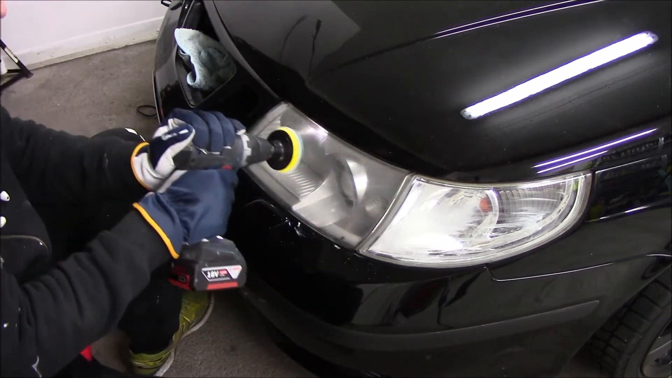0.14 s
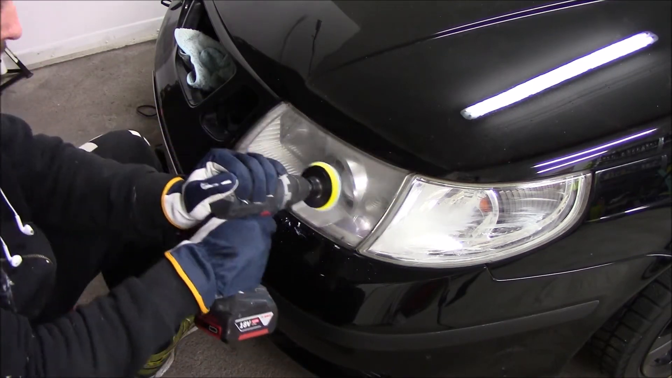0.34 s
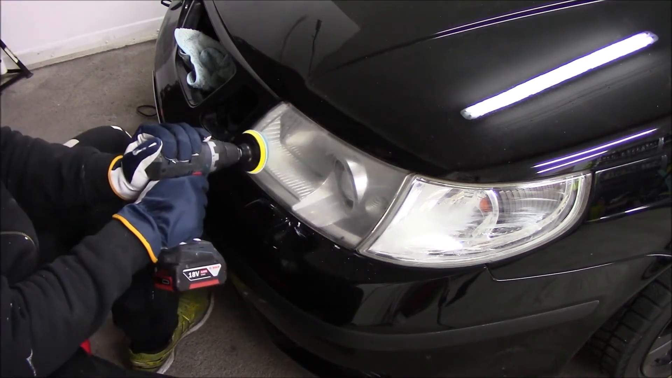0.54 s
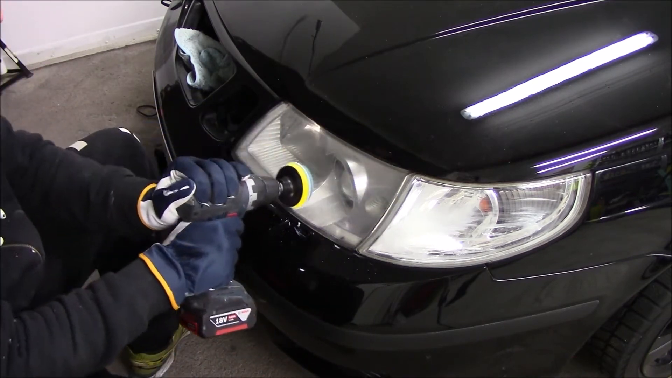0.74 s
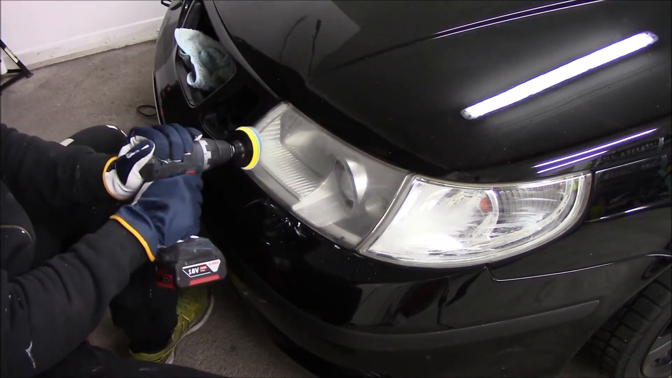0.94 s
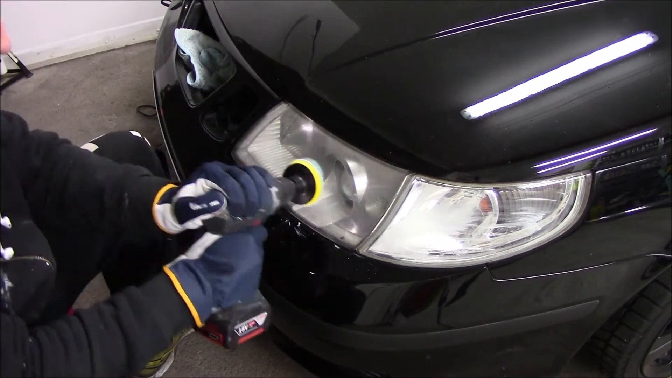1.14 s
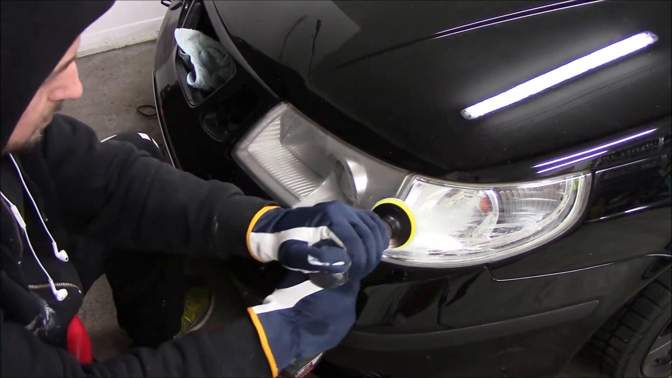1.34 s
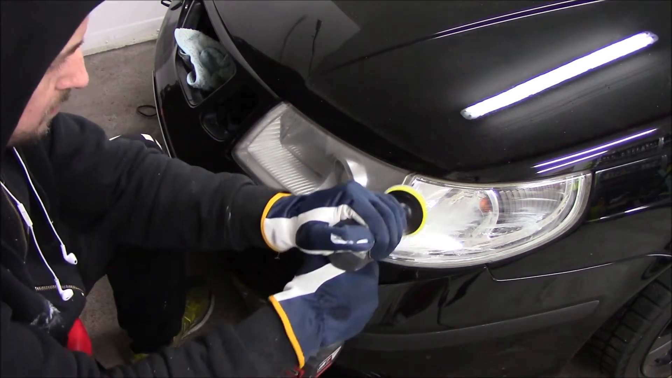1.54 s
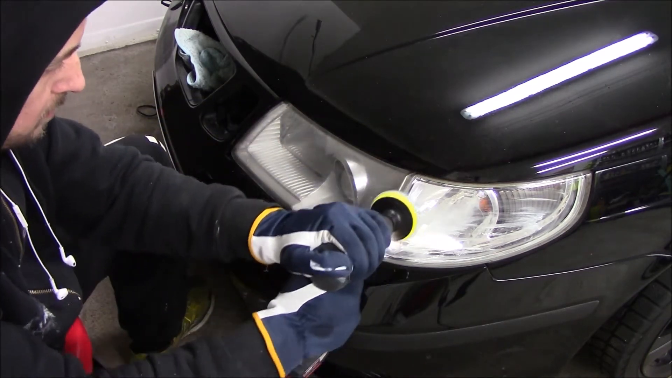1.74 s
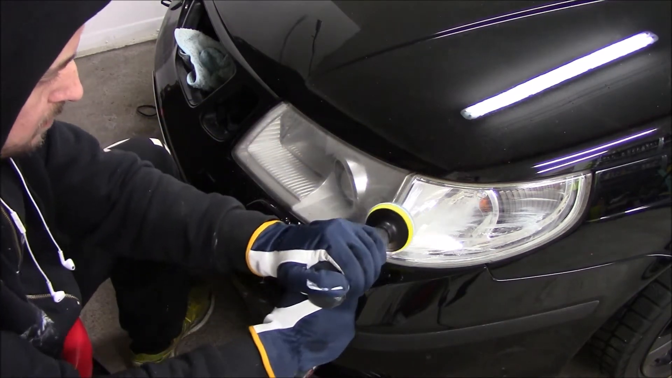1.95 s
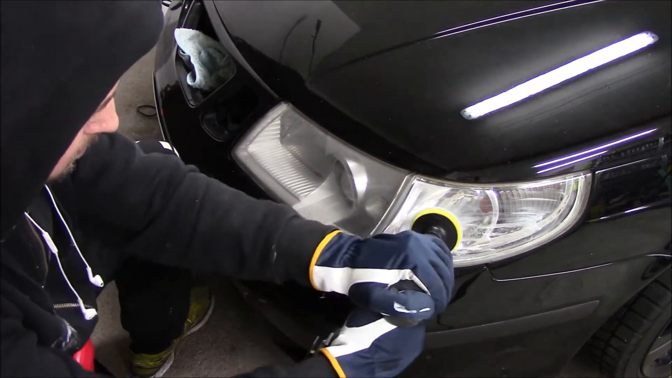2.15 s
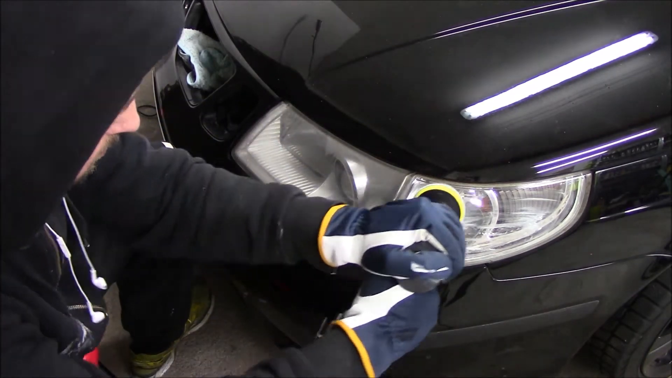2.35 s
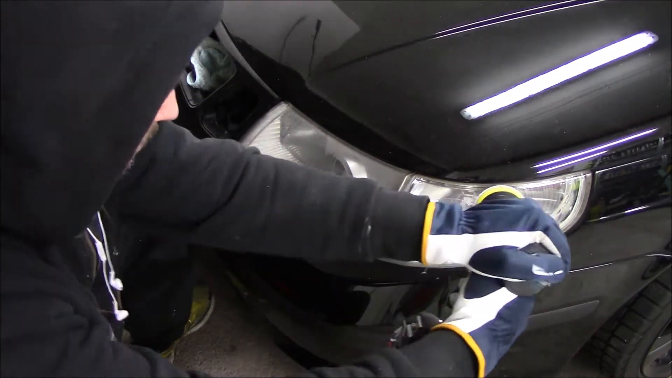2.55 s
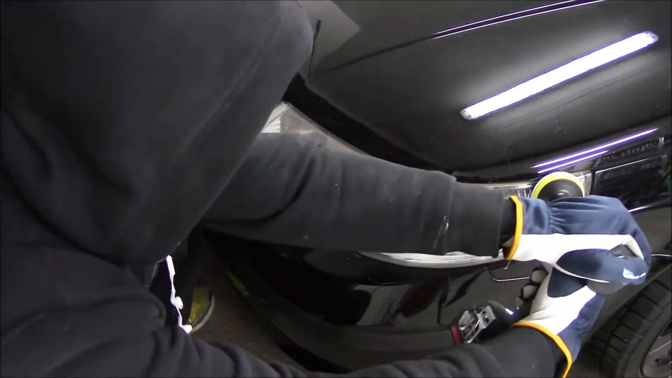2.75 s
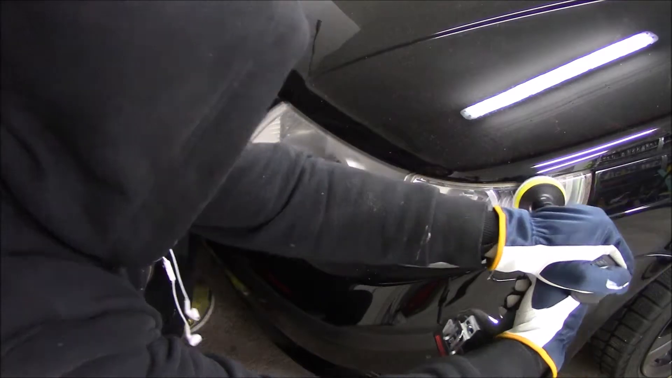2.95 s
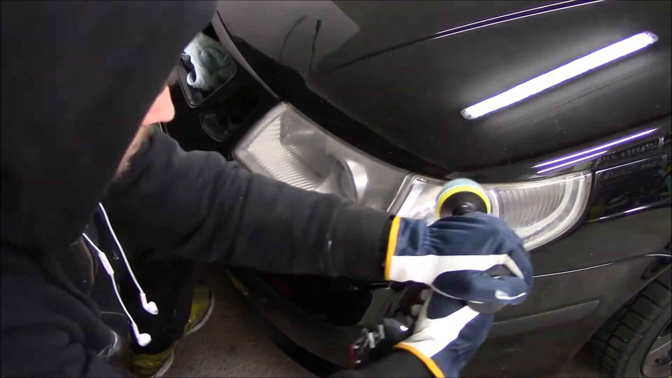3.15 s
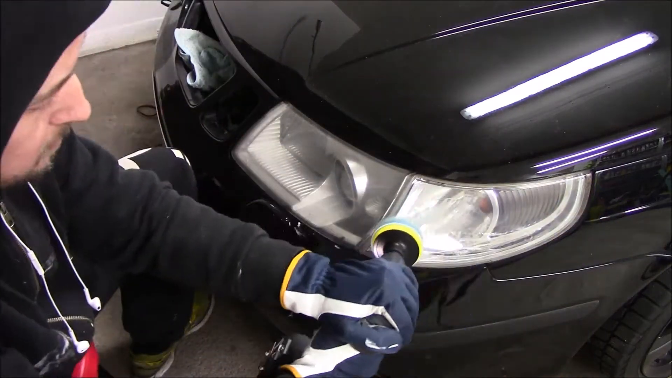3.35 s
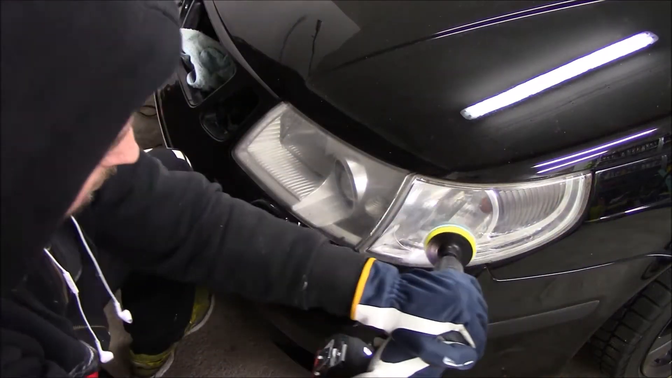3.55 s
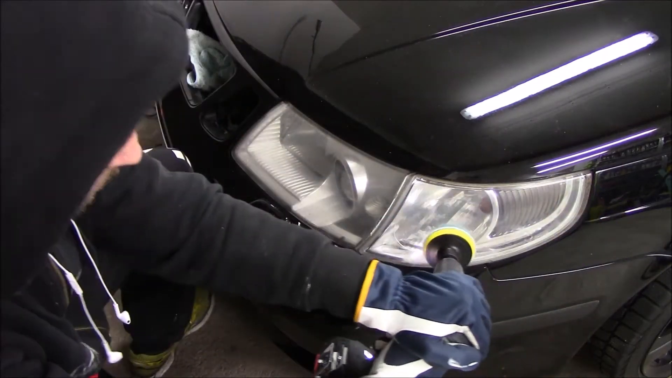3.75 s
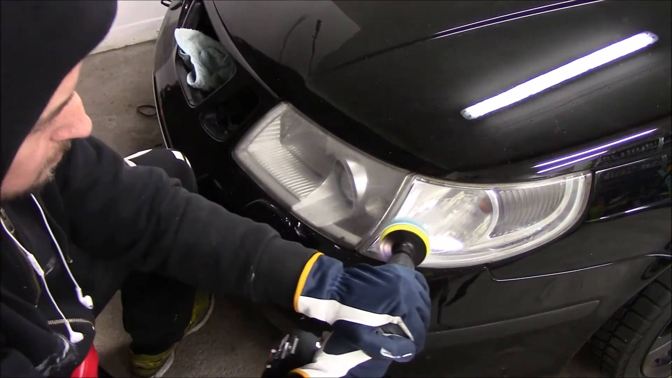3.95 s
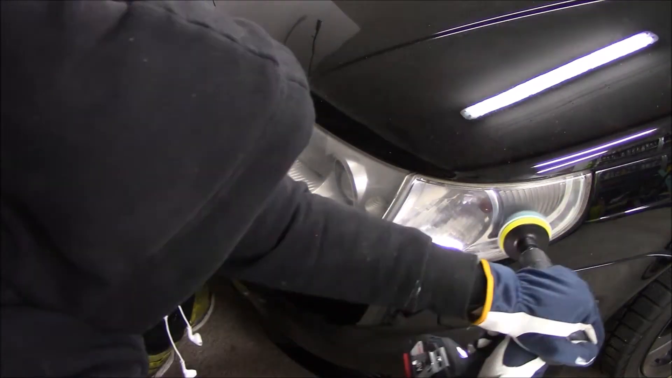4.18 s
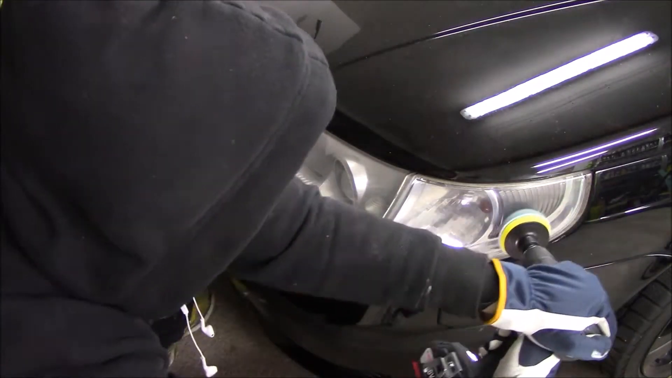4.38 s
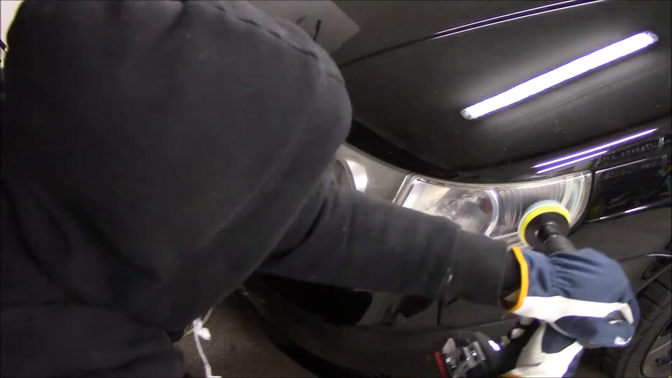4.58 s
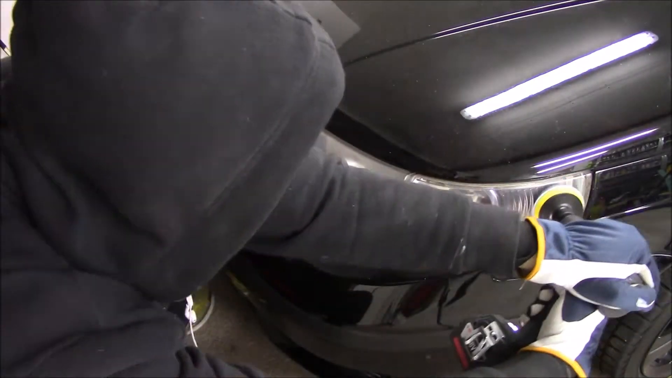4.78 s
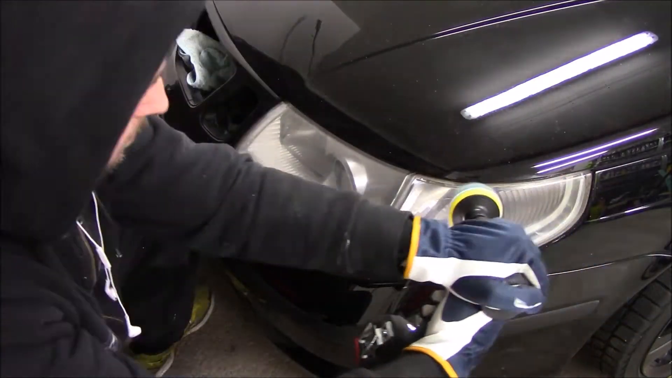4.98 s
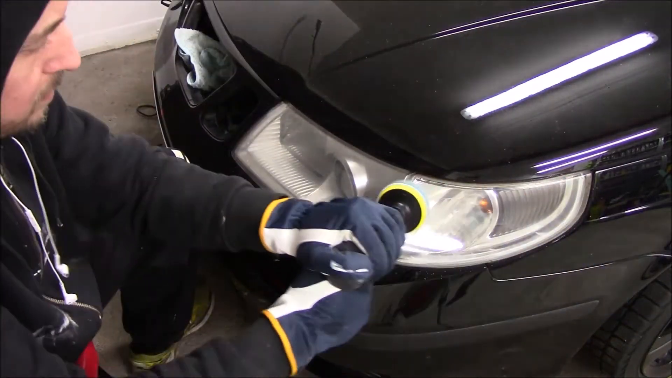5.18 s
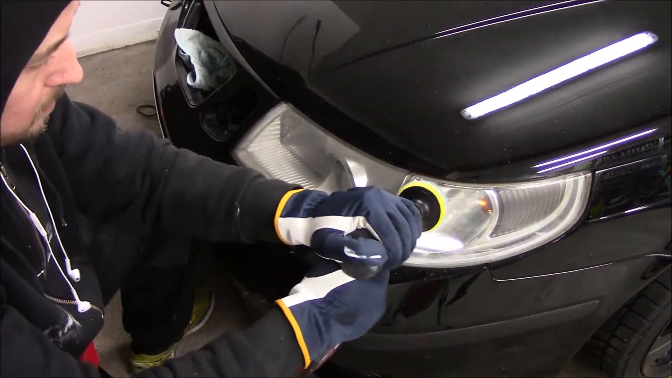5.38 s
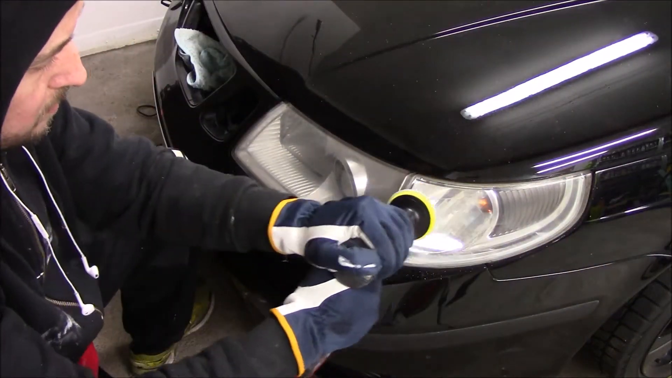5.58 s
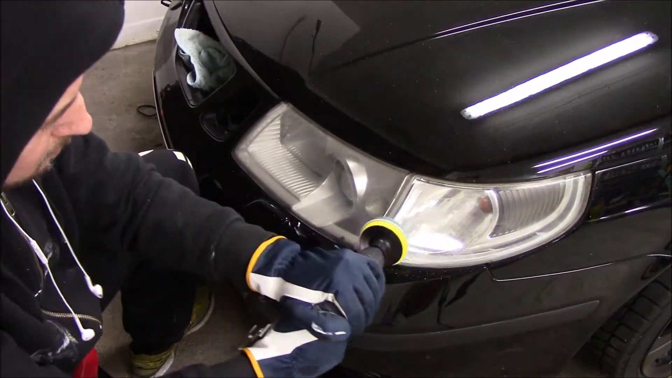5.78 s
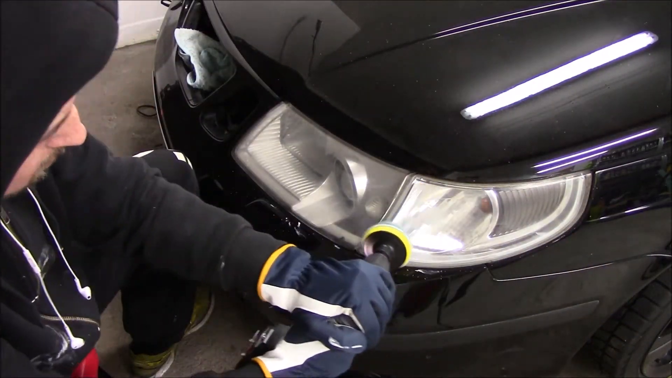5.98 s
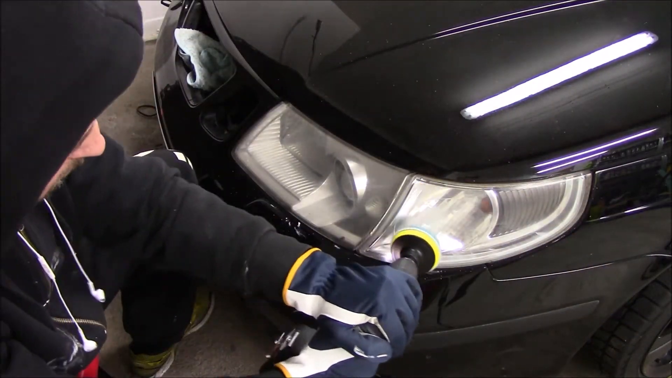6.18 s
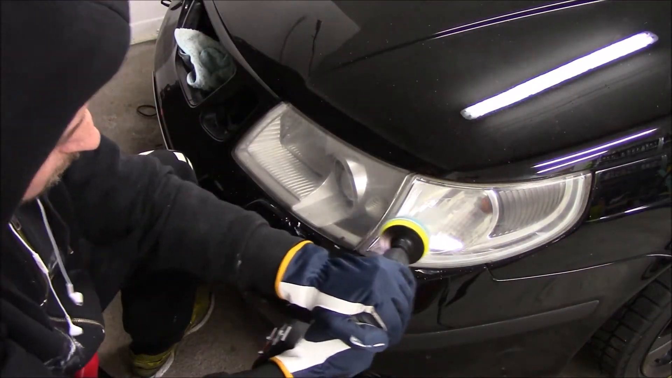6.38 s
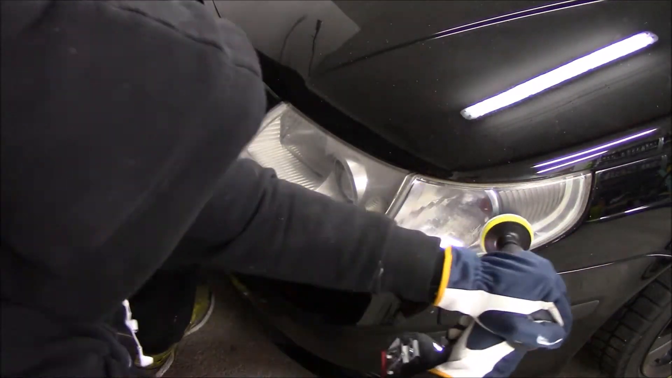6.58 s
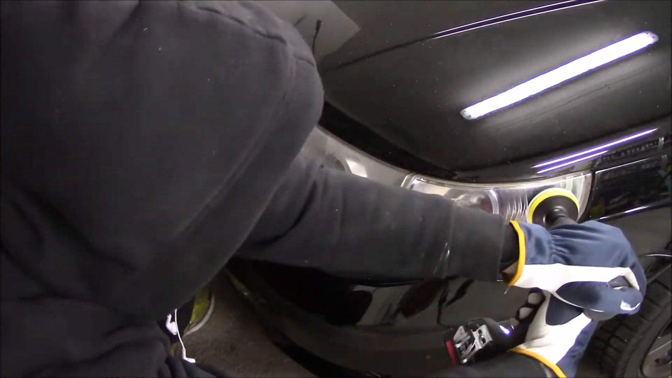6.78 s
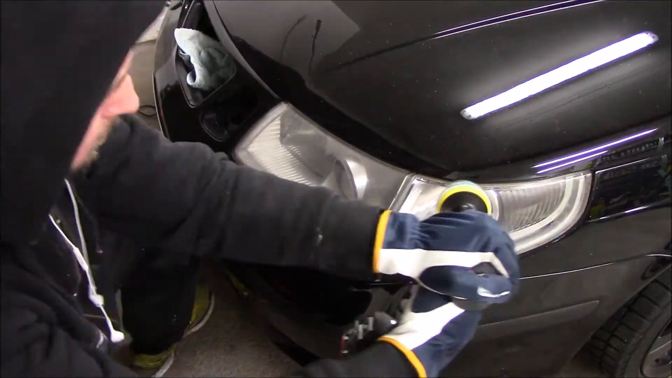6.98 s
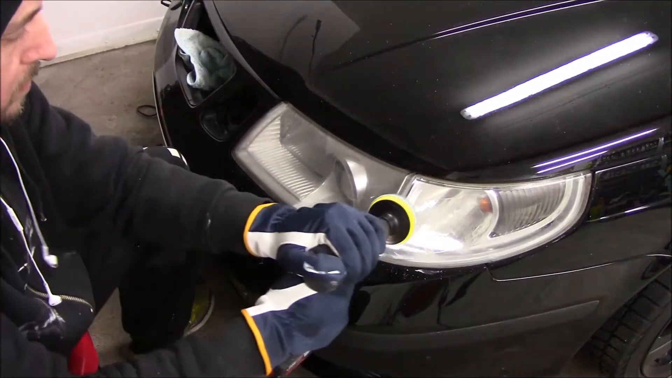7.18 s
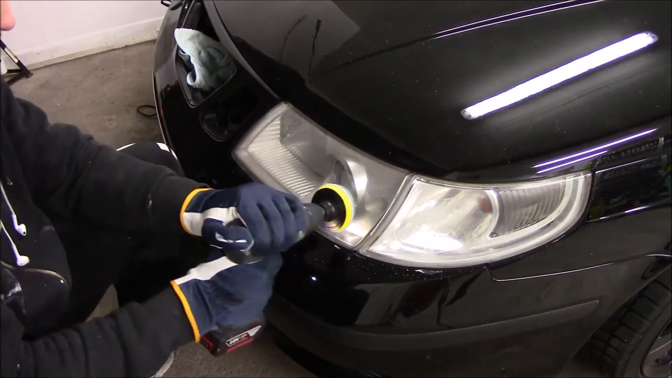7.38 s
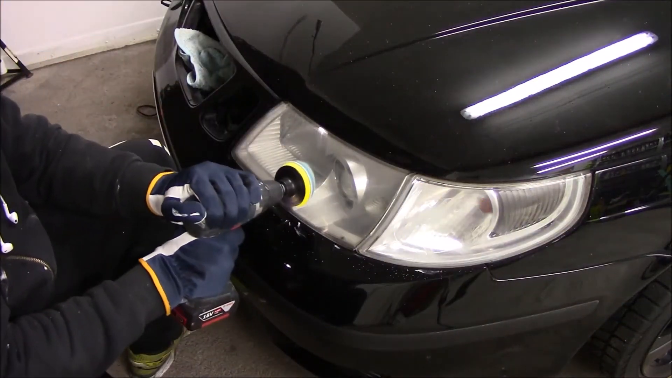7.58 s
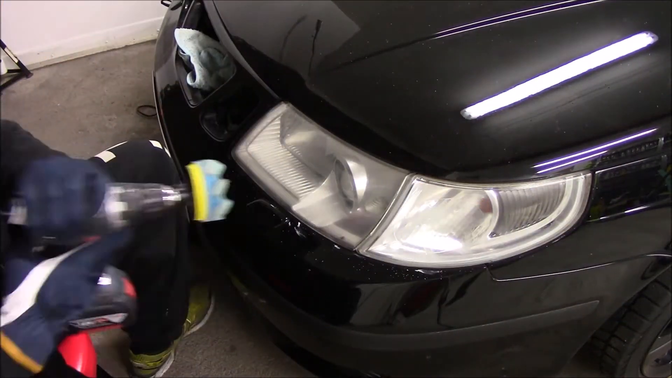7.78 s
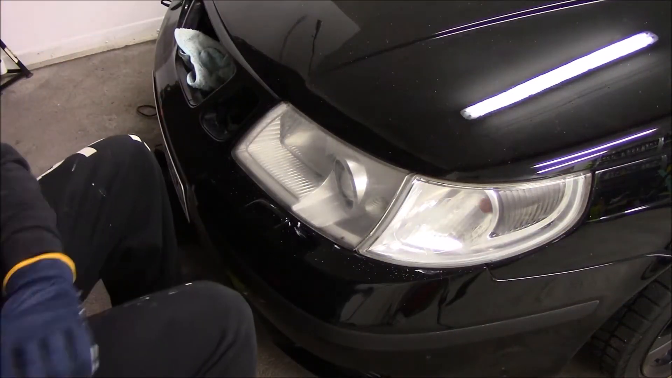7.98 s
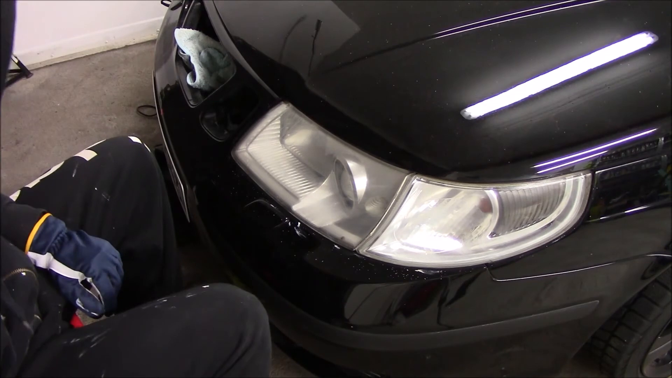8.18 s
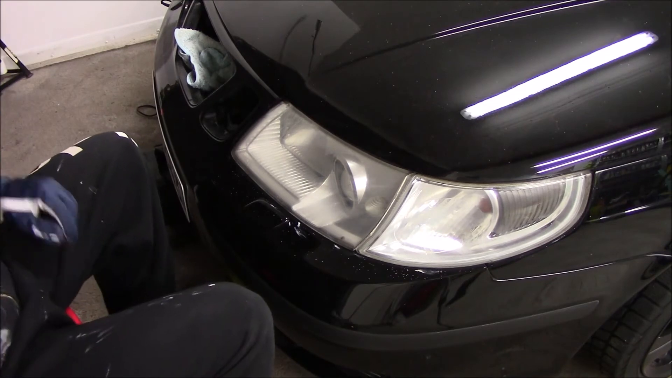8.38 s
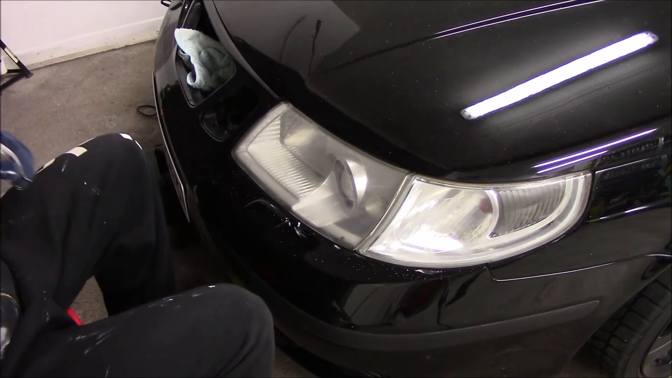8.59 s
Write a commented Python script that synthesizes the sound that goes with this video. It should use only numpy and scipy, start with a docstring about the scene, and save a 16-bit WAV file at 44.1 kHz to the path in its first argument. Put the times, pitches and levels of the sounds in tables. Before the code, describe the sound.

Continuous power drill noise, gritty and hissing, with thin metallic whines that tremble slightly under load and faint hollow lens resonances. The whine plunges in an instant when the motor is braked, leaving near silence in a small, fairly dry garage. Then come slight clothing rustles, one clear plastic knock with tiny ticks after it, and dull quiet background. Heard in mono from a nearby camera.

```python
"""A cordless drill spins a foam pad over a headlight lens in a garage, heard by a mono camera microphone.
Its whine and gear mesh are sines locked to one motor phase; rattle, fan, housing and pad are shaped noise.
The brake stops it: the whine falls ever faster and the noise dies away in the garage.
Cloth rustles and a few small knocks of plastic parts follow, as noise bursts and resonances.
A faint lumpy rumble lies beneath, until the background turns to a duller room hush."""
import sys
import numpy as np
from scipy import signal
from scipy.fft import rfft, irfft, next_fast_len
from scipy.io import wavfile
from scipy.ndimage import uniform_filter1d, map_coordinates

SR = 44100
rng = np.random.default_rng(int(sys.argv[2]) if len(sys.argv) > 2 else 0)


def output_pcm(signal):
    """Save a mono or channel-first signal as 16-bit PCM at the path in sys.argv[1].

    Samples are clipped to [-1, 1] before scaling.
    """
    pcm = np.clip(np.atleast_2d(signal).T, -1, 1) * 32767
    wavfile.write(sys.argv[1], SR, np.round(pcm).astype(np.int16))


N = 380577  # length in samples

# planet beat, shaft beat and tooth mesh as multiples of the whine frequency
PLANET_RATIO, SHAFT_RATIO, MESH_RATIO = .0656, .2075, 2.622
# the trigger is let go and the whine falls with the square of time; then the tones end
BRAKE_S, BRAKE_HZ_PER_S2, WHINE_END_S, TONES_END_S = 7.66, 62000, 7.722, 7.735
NOISE_STOP_S, ROOM_T60_S = 7.731, 0.11  # the brake bites; the garage dies away
REACH_TURN_S = 0.17  # half the time taken to turn in or out of a reach
MESH_1_REST_DB, CASE_REST_DB = -54, -54  # both rise with each reach
SLAP_OVER_RUB = 1.6  # slap gain against plain rubbing, at the height of a boom
BOOM_WIDTH_S, LENS_REST_DB = 0.076, -70.5
RUSTLE_WIDTH_S, CLOTH_REST_DB = 0.014, -61
HUSH_DB, HUSH_START_S = -62, 8.422
TOP_HZ = 15770  # band limit of the camera

# the motor under the load of the pad: time_s, whine_hz
MOTOR_SPEED = [(0.0, 1337), (0.04, 1326), (0.17, 1326), (0.3, 1303), (0.62, 1333), (0.77, 1309),
               (1.02, 1328), (1.56, 1319), (1.62, 1337), (1.73, 1316), (1.79, 1341), (1.9, 1324),
               (2.0, 1338), (2.13, 1323), (2.22, 1336), (2.6, 1316), (2.77, 1327), (2.84, 1315),
               (3.28, 1351), (3.43, 1345), (3.52, 1322), (4.14, 1332), (4.33, 1316), (4.44, 1326),
               (4.8, 1319), (5.21, 1344), (5.52, 1322), (5.8, 1327), (5.87, 1317), (6.29, 1328),
               (6.34, 1338), (6.59, 1303), (6.78, 1302), (7.04, 1327), (7.19, 1328), (7.47, 1310),
               (7.66, 1317)]
# level of the whine: time_s, level_db
WHINE_LEVEL = [(0.0, -52.5), (0.1, -51), (0.39, -57), (0.62, -46), (0.75, -53.5), (1.14, -45.5),
               (1.35, -57), (2.77, -47.5), (4.55, -47), (4.61, -51.5), (4.97, -46.5), (5.57, -54),
               (5.92, -47.5), (6.33, -48), (6.84, -43), (7.42, -55.5), (7.68, -48), (7.7, -51)]
# other tone groups: time_s, fourth_multiple_db, eighth_multiple_db, second_mesh_db, third_mesh_db
TONE_LEVELS = [(0, -56, -48, -58, -53), (.3, -43, -45, -43, -53), (.6, -53, -45, -48, -52),
               (.95, -43, -44, -45, -54), (1.2, -44, -46, -44.5, -43), (2, -39, -41.5, -44.5, -43),
               (2.45, -49, -44, -41, -51), (2.8, -38, -40.5, -47.5, -58), (3.05, -39, -41, -46, -35),
               (3.3, -44, -41, -39, -52), (3.7, -44, -39, -41.5, -35), (4.2, -41, -42.5, -45, -43),
               (4.6, -38.5, -40.5, -45, -36), (5, -40.5, -39.5, -43, -57), (5.3, -38, -42, -40.5, -48),
               (5.6, -46, -41, -44.5, -53.5), (5.9, -51, -41.5, -44, -42), (6.2, -44, -46, -43, -38),
               (6.45, -48, -38, -42.5, -44), (6.7, -40, -42.5, -43, -43), (7, -44, -39.5, -42, -49),
               (7.3, -44, -41.5, -49, -44), (7.66, -39, -44, -48, -50), (7.7, -38.5, -52, -55, -54),
               (7.74, -44, -60, -58, -58)]
# lines on the whine: multiple (of the whine), planet_turns, shaft_turns; then relative level_db of each
FIRST_LINES = [(1, 0, 0), (1, 1, 0), (1, -1, 0), (2, 0, 0)]
FIRST_LINES_DB = [1, -24.5, -25.5, -11]
FOURTH_LINES = [(4, 0, 0)]
EIGHTH_LINES = [(8, 0, 0), (8, 0, -1), (8, 1, 0), (8, -1, 0), (8, 2, 0), (8, 1, 1), (10, 0, 0)]
EIGHTH_LINES_DB = [5.5, -6, -2.5, -11, -3, -12, -13]
# lines on the gear mesh: multiple (of the mesh), planet_turns, shaft_turns; then relative level_db of each
MESH_1_LINES = [(1, 0, 0), (1, 1, 0), (1, 2, 0), (1, 2, -1)]
MESH_1_LINES_DB = [-3, -3, -8, -9]
MESH_2_LINES = [(2, 0, 0), (2, 1, 0), (2, 1, -1), (2, 2, -1), (2, 2, 0), (2, 3, 0), (2, 1, 1), (2, 2, 1),
                (2, 3, 1)]
MESH_2_LINES_DB = [-3.5, -15, -33, -1, -19, -2, -7, -7.5, -14]
MESH_3_LINES = [(3, 5, 0), (3, 0, 0), (4, 5, 0)]
MESH_3_LINES_DB = [0, -6, -11]
# the arms stretch to the far end of the lens and the gear case turns to the microphone:
# start_s, end_s, rise_db
ARM_REACHES = [(2.6, 3.15, 9), (4.147, 4.96, 9), (6.65, 6.966, 10)]
# resonances of the gear case: centre_hz, width_hz, relative level_db
GEAR_CASE_MODES = [(2110, 150, 2.5), (3417, 120, 1)]
# noisy layers of the drill: time_s, rattle_db, fan_db, housing_db, rub_db
NOISE_LEVELS = [(0, -32, -42, -46, -75), (.1, -32, -42, -46, -76), (.7, -31, -41.5, -44.5, -75),
                (1.15, -31, -38.5, -44.5, -71), (1.5, -30.5, -40.5, -45.5, -73),
                (2.25, -28.5, -36.5, -43.5, -67.5), (2.6, -30, -35, -42.5, -72),
                (3.1, -29, -36.5, -40.5, -65), (3.5, -29, -35, -44, -70), (4.1, -29.5, -35, -43.5, -68.5),
                (4.8, -30, -34.5, -41, -67), (5.3, -28, -37.5, -43.5, -70), (5.6, -29.5, -37, -44, -70),
                (6.1, -30, -35.5, -43.5, -67), (6.4, -27.5, -35.5, -43.5, -69), (6.8, -31, -34, -43, -67),
                (7.05, -29, -36, -43.5, -66.5), (7.3, -28.5, -35, -43, -69), (7.55, -29.5, -41, -45, -71),
                (7.72, -29.5, -36, -44, -67)]
# spectrum of the gear rattle: frequency_hz, relative density_db (per Hz)
RATTLE_SPECTRUM = [(3000, -50), (3500, -9.5), (4500, -6), (5500, -5), (7000, -2.5), (8500, -3.5),
                   (10600, -2), (11500, -2.5), (12500, -16)]
# spectrum of the cooling fan: frequency_hz, relative density_db (per Hz)
FAN_SPECTRUM = [(10500, -39.5), (11800, 4), (13000, 7), (15000, 6), (15800, -1.5)]
# a resonance that moves with the drill's place on the lens: time_s, centre_hz, level_db
CAVITY_PATH = [(0, 4700, -39), (.15, 4960, -37), (.3, 3910, -36.5), (.5, 4950, -38.5), (.75, 4660, -37),
               (1, 5080, -37.5), (1.3, 4150, -38.5), (2.2, 4350, -37.5), (2.6, 4100, -41.5),
               (3.2, 4320, -38.5), (3.45, 4700, -38.5), (4.2, 4530, -40), (4.5, 4530, -38.5),
               (4.8, 4330, -38), (5.55, 4030, -38.5), (5.75, 4600, -37.5), (6.1, 5020, -38),
               (6.5, 4660, -38.5), (6.75, 4250, -39.5), (7.2, 4180, -37), (7.5, 4660, -36)]
# resonances of the housing: centre_hz, width_hz, relative level_db
HOUSING_MODES = [(1380, 420, -4), (1857, 110, -1.5), (2165, 114, 1), (2364, 67, -1), (2467, 42, 1.5),
                 (2640, 37, 0.5), (2784, 82, 3.5), (3240, 570, -4)]
# resonances of the lens: centre_hz, width_hz, relative level_db
LENS_MODES = [(960, 55, -1), (1050, 55, -1), (1145, 60, -3)]
# the lens booms where the pad presses on its thin parts: time_s, swell level_db (added to the rest gain)
LENS_BOOMS = [(.15, -64), (.36, -65), (.49, -63), (.66, -60.5), (.86, -62), (1.12, -65), (2.05, -75),
              (2.77, -70), (3.05, -64), (4.77, -69), (4.97, -69), (7.25, -71), (7.55, -61), (7.64, -72)]
# resonances of the foam pad: centre_hz, width_hz, relative level_db
FOAM_MODES = [(588, 70, 3), (834, 360, 2.5)]
# knocks: time_s, level_db (before a common 10.5 dB cut), decay t60_s, ring_db (relative to the knock),
# pitch_factor (smaller parts ring higher)
KNOCK_EVENTS = [(7.7204, -18.5, .015, -27, 1.01), (7.8696, -36, .02, -30, 1.01), (7.938, -51, .1, 7, 0.93),
                (7.969, -47.5, .04, -9.5, 1.01), (8.1538, -20.5, 0.092, -6.5, 1.01),
                (8.2207, -42, .04, -1, 1.34), (8.232, -53, .03, -2, 1.34),
                (8.2571, -50.5, 0.032, 11.5, 1.34), (8.275, -53, .03, 3, 2)]
# resonances of plastic parts at pitch factor 1: centre_hz, width_hz, relative level_db
PLASTIC_MODES = [(1250, 200, -10), (1570, 120, 0), (2120, 200, -11), (3640, 250, -8), (5600, 500, -10)]
# swells of the cloth: time_s, swell level_db (added to the rest gain)
RUSTLE_EVENTS = [(7.9, -72), (7.95, -59), (8.2, -63), (8.42, -71)]
# spectrum of the cloth: frequency_hz, relative density_db (per Hz)
WEAVE_SPECTRUM = [(20, -38), (150, -26), (400, -22), (600, -10.5), (950, -7), (1500, -3), (3000, -4.5),
                  (5500, -7), (10000, -4.5), (13000, -9), (15800, -7.5)]
# level of the rumble: time_s, level_db
RUMBLE_LEVEL = [(0, -89), (1, -82), (1.7, -93), (2.3, -81), (2.7, -90), (3.9, -76), (4.8, -89), (5.3, -77),
                (5.7, -83), (6.4, -74), (7, -83), (7.65, -77), (7.81, -96), (8.4, -100)]
# spectrum of the rumble: frequency_hz, relative density_db (per Hz)
RUMBLE_SPECTRUM = [(15, -17), (30, -8), (80, -9.5), (200, -11), (350, -7.5), (500, -5.5), (600, -8),
                   (800, -40)]
# spectrum of the room hush: frequency_hz, relative density_db (per Hz)
HUSH_SPECTRUM = [(24, -54), (40, -37), (193, -16), (236, -15.5), (566, -12), (866, -15), (982, -16),
                 (1140, -15), (1260, -16.5), (6560, -28), (15800, -45)]


def drill():
    """Superposition: one motor phase drives the tones and modulates the noise of gears, fan and housing."""
    rattle_db, fan_db, housing_db, rub_db = curves(NOISE_LEVELS)
    turns = motor_turns()
    gears = knocking(turns, throb=0.049, grain_db=0.5)
    rattle = amp(rattle_db + 0.21 * wobble(7)) * patches(shaped(gears, RATTLE_SPECTRUM), patchy_db=1.6)
    fan = amp(fan_db + 0.64 * wobble(7)) * patches(shaped(gears, FAN_SPECTRUM), patchy_db=1.2)
    hollow = amp(curves(CAVITY_PATH)[1]) * cavity(turns)
    housing_drive = knocking(turns, throb=.1, grain_db=-1.0)
    housing = amp(housing_db) * ringing(housing_drive, HOUSING_MODES, skirt_hz=1300)
    rub_noise = rng.standard_normal(N)
    rub = amp(rub_db + 3 * wobble(9)) * ringing(rub_noise, FOAM_MODES, skirt_hz=556)
    after_stop_s = np.clip(np.arange(N) / SR - NOISE_STOP_S, 0, None)
    dying = amp(-60 * after_stop_s / ROOM_T60_S)
    return tones(turns) + (rattle + fan + hollow + housing + lens(turns) + rub) * dying


def motor_turns():
    """Phase is the integral of frequency: the whine's cycles, summed through load, tremble and braking."""
    braking_s2 = np.clip(np.arange(N) / SR - BRAKE_S, 0, .1) ** 2
    speed_hz = curves(MOTOR_SPEED)[0] - BRAKE_HZ_PER_S2 * braking_s2
    # the pad grabs and slips, so the speed trembles
    return np.cumsum(speed_hz + 2.6 * wobble(30)) / SR


def tones(turns):
    """Magnetic whine and tooth meshing give harmonics, with sidebands at the planet and shaft rates."""
    fourth_db, eighth_db, mesh_2_db, mesh_3_db = curves(TONE_LEVELS)
    reach_db = sum(db * span(start - REACH_TURN_S, end + REACH_TURN_S, 2 * REACH_TURN_S)
                   for start, end, db in ARM_REACHES)
    whine = amp(curves(WHINE_LEVEL)[0]) * span(-1, WHINE_END_S, 0.027)
    whine *= lines(turns, FIRST_LINES, FIRST_LINES_DB, waver_db=0.8, blur=.1)
    whine += amp(fourth_db) * lines(turns, FOURTH_LINES, [-1.5], waver_db=2.5, blur=0.66)
    whine += amp(eighth_db) * lines(turns, EIGHTH_LINES, EIGHTH_LINES_DB, waver_db=2.0, blur=0.63)
    mesh_groups = [(MESH_1_REST_DB + reach_db, MESH_1_LINES, MESH_1_LINES_DB),
                   (mesh_2_db, MESH_2_LINES, MESH_2_LINES_DB),
                   (mesh_3_db, MESH_3_LINES, MESH_3_LINES_DB)]
    mesh = np.zeros(N)
    for db, orders, levels_db in mesh_groups:
        mesh += amp(db) * lines(turns, orders, levels_db, waver_db=4.0, blur=0.75, step=MESH_RATIO)
    case_drive = knocking(turns, throb=0.12, grain_db=4.5)
    case = amp(reach_db + CASE_REST_DB) * ringing(case_drive, GEAR_CASE_MODES, skirt_hz=1800)
    return (whine + mesh + case) * span(-1, TONES_END_S, 0.03)


def lines(turns, orders, levels_db, waver_db, blur, step=1):
    """Order locking: tones keep fixed ratios to the motor, each wavering in level and phase (blur, rad)."""
    out = np.zeros(N)
    for (multiple, planet, shaft), db in zip(orders, levels_db):
        order = multiple * step + planet * PLANET_RATIO + shaft * SHAFT_RATIO
        phase = 2 * np.pi * order * turns + blur * wobble(40)
        out += amp(db + waver_db * wobble(25)) * np.sin(phase)
    return np.sqrt(2) * out


def knocking(turns, throb, grain_db):
    """Amplitude modulation: gear noise swells once per planet turn, with a random grain."""
    swell = 1 + throb * np.cos(2 * np.pi * PLANET_RATIO * turns + 1.8 * wobble(10))
    grain = amp(grain_db * wobble(900) + 0.51 * wobble(9))
    return swell * grain * rng.standard_normal(N)


def cavity(turns):
    """Cavity resonance: rattle passes two bands whose centres slide together at a fixed ratio."""
    time_s, centre_hz, _ = np.transpose(CAVITY_PATH)

    def band(hz, centre, width):
        return 1 / (1 + ((hz - centre) / width) ** 4)

    def bands(hz, t):
        centre = np.interp(t, time_s, centre_hz)
        return band(hz, centre, 380) + 0.81 * band(hz, 1.272 * centre, 350)

    return patches(knocking(turns, throb=0.05, grain_db=0), patchy_db=1.0, bands=bands)


def lens(turns):
    """Forced resonance: one slap per planet turn and plain rubbing excite the modes of the lens."""
    slaps = np.diff(np.floor(PLANET_RATIO * turns), prepend=0) * amp(1.5 * wobble(60))
    boom = swells(LENS_BOOMS, BOOM_WIDTH_S, LENS_REST_DB)
    slap_share = 1 - amp(LENS_REST_DB) / boom  # near 0 at rest, near 1 in a strong boom
    drive = SLAP_OVER_RUB * slap_share * unit(slaps) + rng.standard_normal(N)
    return boom * ringing(drive, LENS_MODES, skirt_hz=843)


def knocks():
    """Impact and free decay: a crack, a short scatter from nearby surfaces and a dull ring of plastic."""
    out, t = np.zeros(N + SR), np.arange(SR // 4) / SR
    body = ringing(rng.standard_normal(N), PLASTIC_MODES, skirt_hz=900)
    for k, (start_s, db, t60_s, ring_db, pitch) in enumerate(KNOCK_EVENTS):
        fade = amp(-60 * t / t60_s)
        # a 6.1 ms crack over the slower scatter
        crack = (amp(-60 * t / 0.0061) + 0.43 * fade) * rng.standard_normal(len(t))
        # each ring reads its own stretch of the body, resampled to its pitch
        resonance = np.interp((k / 2 + pitch * t) * SR, np.arange(N), body)
        ring = amp(ring_db) * fade * (1 - np.exp(-t / 0.00094)) * resonance
        out[round(start_s * SR):][:len(t)] += amp(db - 10.5) * (crack + ring)
    return filtered(out[:N], lambda hz: hz ** 4 / (hz ** 4 + 900 ** 4))


def cloth():
    """Friction noise: the weave of clothes gives grainy noise, heard once the drill is quiet."""
    grain = amp(1.2 * wobble(360) + 0.56 * wobble(40)) * rng.standard_normal(N)
    rustle = swells(RUSTLE_EVENTS, RUSTLE_WIDTH_S, CLOTH_REST_DB) * shaped(grain, WEAVE_SPECTRUM)
    return rustle * span(7.74, 9, 0.028)


def rumble():
    """Low-frequency random noise: slow modulation of its level makes it lumpy."""
    lumps = amp(4 * wobble(23) + 4 * wobble(6.7)) * rng.standard_normal(N)
    return amp(curves(RUMBLE_LEVEL)[0]) * shaped(lumps, RUMBLE_SPECTRUM)


def room_hush():
    """Stationary coloured noise: a dull spectrum, with a slight waver in level."""
    return amp(HUSH_DB + 1.1 * wobble(15)) * shaped(rng.standard_normal(N), HUSH_SPECTRUM)


def background():
    """Crossfade: rumble and cloth give way within milliseconds to the duller hush."""
    before = span(-1, HUSH_START_S, 0.0032)
    return (rumble() + cloth()) * before + room_hush() * (1 - before)


def amp(db):
    """Decibel law: the amplitude ratio of a level in dB."""
    return 10 ** (np.asarray(db) / 20)


def unit(x):
    """Normalisation: x at rms 1."""
    return x / np.sqrt(np.mean(x ** 2) + 1e-20)


def curves(rows):
    """Linear interpolation: one value per sample for each column after the time."""
    time_s, *columns = np.transpose(rows)
    return [np.interp(np.arange(N) / SR, time_s, column) for column in columns]


def wobble(rate):
    """Band-limited randomness: a smooth curve through random knots, rate of them a second."""
    knots = rng.standard_normal(int(N * rate / SR) + 4)
    return map_coordinates(knots, [np.arange(N) * rate / SR])


def span(t0, t1, fade):
    """Gating: 1 between two times, with linear fades (all in s)."""
    t = np.arange(N) / SR
    return np.clip(np.minimum(t - t0, t1 - t) / fade, 0, 1)


def swells(rows, width_s, rest_db):
    """Gaussian envelopes: each row adds a swell to a resting gain."""
    t = np.arange(N) / SR
    return amp(rest_db) + sum(amp(db) * np.exp(-((t - s) / width_s) ** 2) for s, db in rows)


def filtered(x, response):
    """Convolution theorem: the spectrum of x times a complex response of frequency."""
    m = next_fast_len(N + SR // 2)
    return irfft(rfft(x, m) * response(np.fft.rfftfreq(m, 1 / SR)), m)[:N]


def shaped(x, points):
    """Spectral colouring: x under dB points joined on a log frequency axis, at rms 1."""
    f, db = np.transpose(points)
    return unit(filtered(x, lambda hz: amp(np.interp(np.log(hz + 1), np.log(f + 1), db))))


def ringing(x, modes, skirt_hz):
    """Modal superposition: x through fixed resonances, weakened below skirt_hz, at rms 1."""
    def response(hz):
        total = 0
        for k, (centre, width, db) in enumerate(modes):
            damping = 1j * hz * width
            # neighbouring modes alternate in sign
            total = total + (-1) ** k * amp(db) * damping / (centre * centre - hz * hz + damping)
        return total * hz ** 4 / (hz ** 4 + skirt_hz ** 4)

    return unit(filtered(x, response))


def patches(x, patchy_db, bands=lambda hz, t: 1):
    """Time-varying filtering: random patches of gain drift as the hands turn the drill, at rms 1."""
    hz, t, z = signal.stft(x, SR, nperseg=256)
    field = uniform_filter1d(rng.standard_normal(z.shape), size=3, axis=0)
    field = uniform_filter1d(field, size=60, axis=1)
    z = z * bands(hz[:, None], t) * amp(patchy_db * unit(field))
    return unit(signal.istft(z, SR, nperseg=256)[1][:N])


def scene():
    """Linear superposition at one microphone, which feeds both channels."""
    mono = drill() + knocks() + background()
    return np.array([mono, mono])


def record(dry):
    """Band limiting: the camera keeps nothing above its top frequency."""
    return np.array([filtered(channel, lambda hz: hz < TOP_HZ) for channel in dry])


dry = scene()
out = record(dry)
output_pcm(out)
```